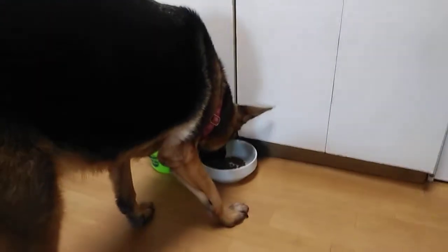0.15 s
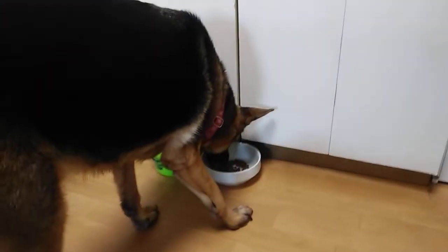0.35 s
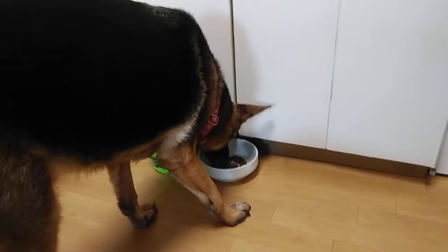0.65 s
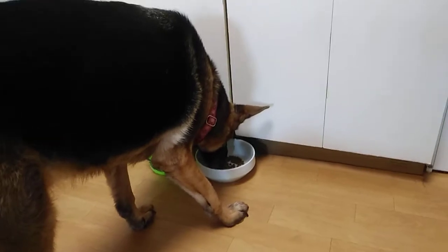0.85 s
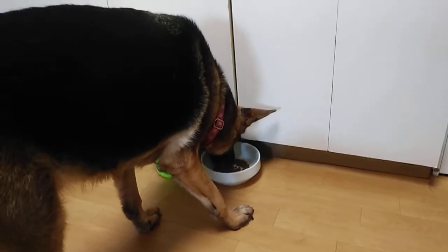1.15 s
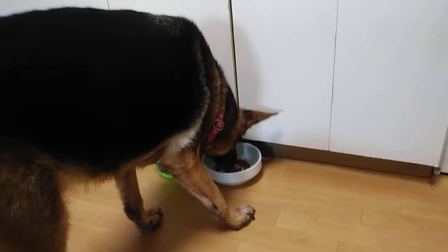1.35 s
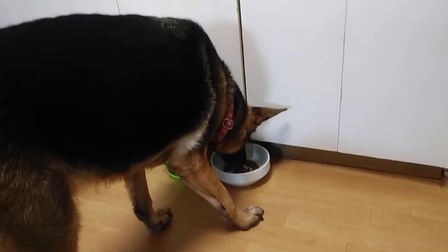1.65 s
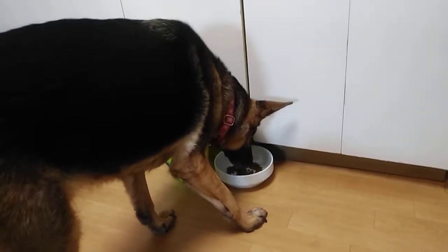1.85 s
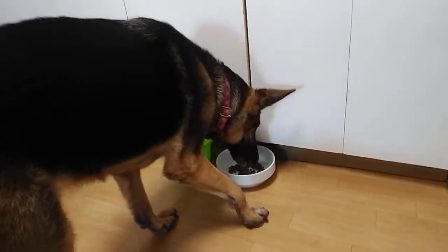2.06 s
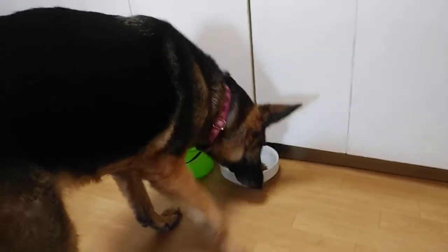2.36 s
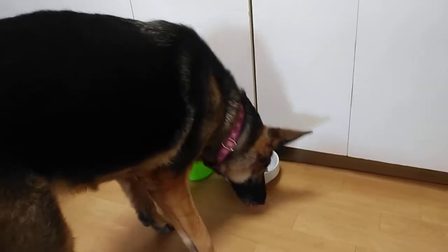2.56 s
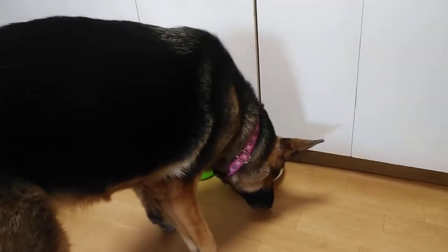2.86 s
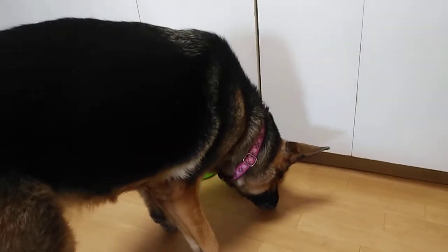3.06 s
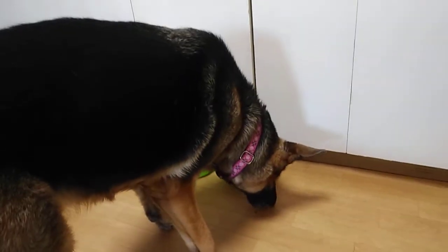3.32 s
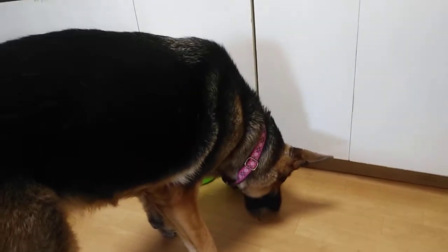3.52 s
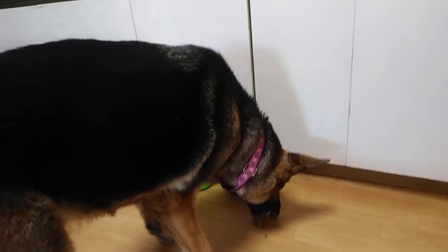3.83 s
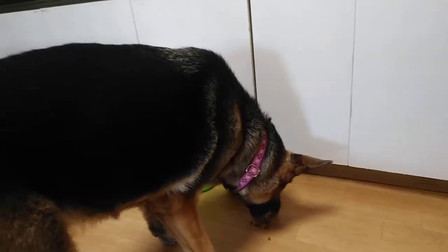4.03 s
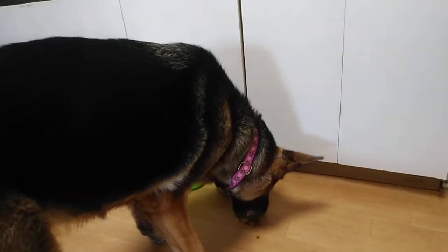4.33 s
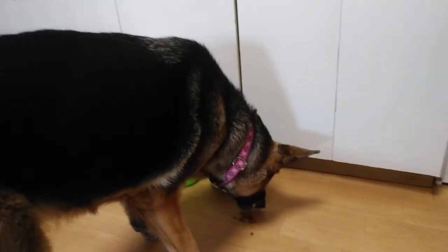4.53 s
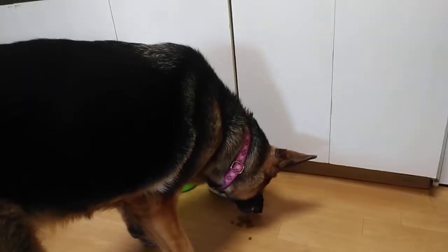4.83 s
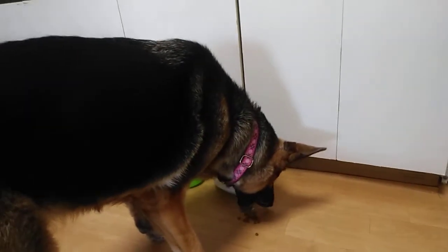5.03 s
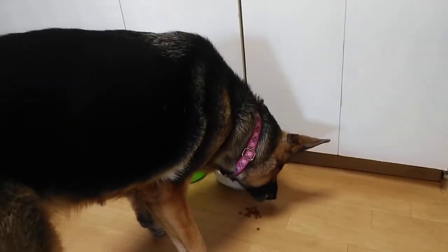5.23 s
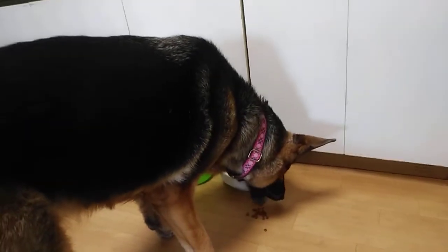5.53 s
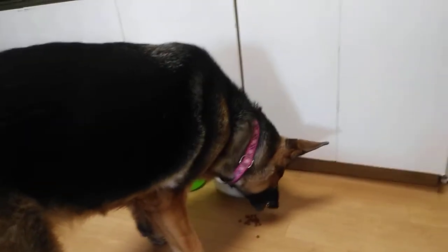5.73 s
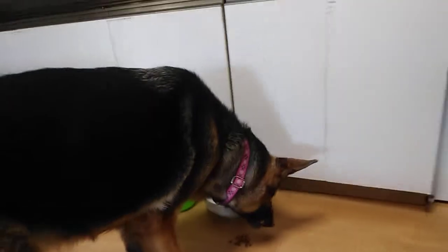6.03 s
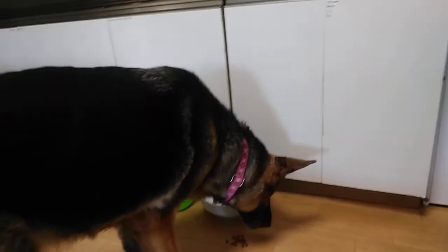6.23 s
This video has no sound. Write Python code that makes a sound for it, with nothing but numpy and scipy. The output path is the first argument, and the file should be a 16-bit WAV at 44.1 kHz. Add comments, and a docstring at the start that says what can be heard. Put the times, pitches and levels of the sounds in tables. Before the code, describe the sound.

A small, slightly echoing kitchen with low room tone and faint appliance hum, heard through a close hand-held microphone. From 0.2 to 1.5 s a large dog cracks dry pellets quickly and lightly, bright ticks mixed with tiny high clinks from a glazed bowl, while soft dull bumps knock the microphone. A lull follows until about 2.2 s, then hollow, gritty crunches swell to 2.6 s with a faint wavering low tone and a thud. Near 3.0 to 3.2 s pellets tap on the wooden floor amid sharp cracks; a bump at 3.3. From 3.5 to 4.1 s the crunching is densest and loudest, with rumble and rough scuffs peaking at 4.0, ending in a short gritty scrape. Afterward bites are sparser, strong ones at 4.5, 5.25 and 5.9 s, with more floor taps, small scuffs and repeated boomy thuds, the heaviest at 5.0, until about 6.3 s.

```python
"""A big dog eats dry food in a small kitchen: pellets crack between its teeth, each a noise burst through a
mouth resonance plus bright clicks, and crumbs grind as random grains. Pellets clink in a glazed bowl and drop
on the wooden floor (struck modes); the bowl and paws scuff. Dull handling bumps knock the hand-held microphone,
with a low rumble of handling and footsteps, a faint wavering tone, filtered-noise room tone and an appliance hum."""
import sys
import numpy as np
from scipy import signal
from scipy.io import wavfile

SR = 44100
rng = np.random.default_rng(int(sys.argv[2]) if len(sys.argv) > 2 else 0)


def persist_wave(psi):
    """Save psi, clipped to +-1, as 16-bit WAV."""
    counts = np.round(np.clip(psi, -1, 1) * 32767).astype(np.int16)
    wavfile.write(sys.argv[1], SR, np.atleast_2d(counts).T)


N = 281402

# room tone: f/Hz, relative density/dB per Hz
ROOM_TONE = [(18, -36), (30, -10), (59, 4.5), (103, -0.5), (179, -9), (245, -9), (1160, -24), (1250, -26.5),
             (1460, -27.5), (5170, -42.5), (7670, -60.5), (10800, -44.5), (13700, -52), (16000, -52)]
# appliance hum: f/Hz, width/Hz, level/dB
HUM_LINES = [(121.7, 42, -49.5), (1275.3, 18, -65.5), (11000, 33, -104)]
ROOM_TONE_DB = -44.5

# low resonances of the rumble: f/Hz, width/Hz, level/dB
RUMBLE_RESONANCES = [(82, 19.1, 4), (121.7, 50, -3.5)]
# rumble swells of handling and footsteps: peak t/s, level/dB, deep part re level/dB, fade/s
RUMBLE_SWELLS = [(0.0, -51.5, 18, 0.12), (0.5, -44.5, -5, 0.18), (1.08, -45, 10, .12), (1.542, -41, 6, 0.1),
                 (2.42, -48.5, 6, 1), (3.53, -34, -11, 0.083), (3.751, -19, -10, 0.048),
                 (3.87, -26.5, -23, 0.014), (4.07, -24, -26, 0.065), (4.48, -40, -10, 0.19),
                 (5.49, -39, 5, 0.013), (6.22, -42, 9.5, 0.1)]
RUMBLE_RISE_S = 0.028
STILL_DB, STILL_DEEP_DB = -48.5, -3.5  # rumble at rest; deep part re that
AFTER_DB, AFTER_DEEP_DB = -19, 3  # rumble after a bump, re its boom; deep part re that
AFTER_DELAY_S, AFTER_RISE_S, AFTER_FADE_S = 0.015, 0.015, 0.033

# wavering tone: t/s, level/dB
WAVER_LEVEL = [(0.0, -54), (1.87, -55), (2.24, -43.5), (2.54, -46), (2.7, -54.5), (3.0, -64.5), (3.9, -48),
               (4.34, -58.5), (6.38, -53.5)]
WAVER_HZ = 238.5

# bouts of chewing, and the gritty mid-range of the big shove near 4.0 s:
# peak t/s, grinding level/dB, hollow part re grinding/dB, hollow f/Hz, fade/s
GRIND_BOUTS = [(0.24, -68.5, 4, 2430, 0.13), (0.68, -67, -1, 2540, 0.14), (1.03, -74, -1, 2170, 0.6),
               (1.35, -71.5, 8, 1980, 0.08), (2.2, -52, 0.5, 3040, 0.05), (2.245, -58, 15.5, 4170, 0.023),
               (2.33, -64, 0, 1800, 0.12), (2.435, -50.5, 6, 3700, 0.055), (2.59, -52, 4, 3530, 0.063),
               (2.73, -54, 0.5, 1780, .06), (2.81, -64, 6, 1930, 0.031), (3.09, -70, 15, 1980, 0.073),
               (3.6, -52, 6, 2930, 0.063), (3.67, -60, 5, 2600, 0.037), (3.74, -57.5, 12.5, 1500, 0.069),
               (3.925, -53, -4, 2800, 0.086), (4.002, -50, 10, 1750, 0.05), (4.045, -48.5, 14, 1800, 0.053),
               (4.428, -66.5, 5.5, 1900, 0.093), (4.95, -61.5, 6, 3580, 0.072), (5.25, -71, 9, 1860, 0.091),
               (5.61, -66, 1, 2300, .1), (5.74, -70, 14, 1390, 0.065), (5.93, -65, 11, 1960, 0.063)]
# treble colour of the crumbs: f/Hz, width/Hz, level/dB
CRUMB_RESONANCES = [(5370, 4300, 11.5), (9880, 3100, -0.5), (14000, 3400, -7.5)]
GRIND_RISE_S = 0.012
NOSING_DB, NOSING_HOLLOW_DB, NOSING_HZ = -73.5, -3, 1560  # faint rustle between bouts

# dull handling bumps on the microphone: t/s, level/dB, boom re level/dB, hard knock re level/dB
BUMP_EVENTS = [(0.106, -20, 1, -13), (0.16, -28, 9, -15), (0.303, -23, 0, -14), (1.023, -36.5, 10, -22),
               (1.068, -33.5, 1, -20), (1.098, -28, -5, -17), (1.127, -39, 13, -22), (1.164, -41, -8, -19),
               (1.183, -27, 3, -19), (1.274, -23.5, 7.5, -15), (2.318, -18.5, 8.5, -16),
               (3.284, -15.5, 1.5, -18), (3.523, -36.5, 2, -25), (3.997, -16.5, -9, -15),
               (4.038, -23, -3, -12), (4.75, -16.5, 1, -21), (4.975, -34, 9, -22), (5.012, -32, -4, -25),
               (5.028, -11.5, -2.5, -21), (5.178, -23, -2.5, -16), (5.398, -15, 0.5, -19),
               (5.468, -31, 8, -25), (5.706, -16.5, -5, -15), (5.794, -18, 2.5, -20), (5.967, -22, -8, -22),
               (6.027, -34, 5, -23), (6.05, -35.5, 15, -25), (6.109, -32, 7, -21)]
# soft rap of a bump: f/Hz, level/dB, t60/s
RAP_MODES = [(234.4, 4, 0.026), (403.6, -4, 0.031)]
# hard knock of a bump: f/Hz, level/dB, t60/s
KNOCK_MODES = [(796, 2.5, 0.027), (1310, -6, 0.021)]
# boom of a bump: f/Hz, level/dB, t60/s
BOOM_MODES = [(66.5, -6, 0.16), (85.3, -10, 0.12)]

# bowl and paws scuffing across the floor: peak t/s, level/dB, fade/s
SCUFFS = [(.165, -47, 0.034), (1.1, -55, 0.038), (2.43, -44.5, 0.2), (3.574, -46.5, 0.042),
          (3.674, -32, 0.026), (3.744, -32.5, .08), (3.999, -24, 0.032), (4.039, -18.5, 0.044),
          (5.41, -41.5, 0.036), (5.445, -51, 0.066), (5.569, -47, .025), (5.745, -36.5, 0.02),
          (5.81, -47, 0.062)]
# floor and bowl under the scuffs: f/Hz, width/Hz, level/dB
SCUFF_RESONANCES = [(208, 44, 5), (427, 290, -6.5), (639, 150, -3.5), (1260, 630, -13.5),
                    (1730, 3100, -25.5)]
SCUFF_RISE_S = 0.0054

# pellets cracking: t/s, hollow ring f/Hz, hollow peak/dB, bright peak/dB
CRACK_EVENTS = [(0.223, 5600, -47, -41.5), (0.234, 5860, -41, -46), (0.2682, 5760, -57, -35),
                (0.3363, 2760, -42, -67), (0.3864, 1650, -53, -39.5), (0.436, 1760, -59, -43),
                (0.473, 1640, -44.5, -38), (0.618, 5000, -50, -47), (0.652, 6000, -56, -50),
                (0.677, 4770, -60, -53), (0.707, 4790, -56, -39), (0.7726, 1650, -60, -44),
                (0.8044, 2700, -55, -44), (0.8614, 3770, -42, -40), (0.9306, 6800, -65, -42.5),
                (0.9783, 2090, -49, -38.5), (0.997, 5000, -55, -44), (1.018, 6000, -53, -46),
                (1.0413, 2800, -44, -39), (1.0563, 4840, -44, -42), (1.1493, 2640, -47, -39),
                (1.163, 2770, -53, -36), (1.3434, 2550, -48, -40), (1.3828, 6000, -47, -37.5),
                (1.4124, 1530, -53, -36.5), (1.4853, 1710, -57, -40.5), (2.173, 3840, -46, -46),
                (2.2287, 4400, -41, -53), (2.254, 4330, -32, -59), (2.3254, 1980, -44, -41.5),
                (2.357, 4070, -44, -42), (2.4235, 3600, -30, -55), (2.4369, 3470, -24, -55),
                (2.4846, 3685, -27, -59), (2.585, 4970, -34, -52), (2.7242, 1690, -38.5, -40),
                (2.805, 2000, -54, -33), (2.82, 3500, -55, -36), (2.834, 4360, -45, -44),
                (2.9136, 4600, -39.5, -46), (2.99, 1830, -38.5, -36.5), (3.0765, 1700, -26, -30),
                (3.095, 2960, -31, -44), (3.1414, 1990, -29, -34.5), (3.179, 1770, -35.5, -32),
                (3.2864, 1500, -39, -71), (3.5063, 2700, -21, -53), (3.5867, 3220, -19.5, -54),
                (3.6232, 2900, -21.5, -49), (3.6411, 3100, -17, -55), (3.721, 3060, -23, -58),
                (3.79, 2830, -28.5, -34), (3.8113, 3500, -35, -52), (3.8407, 2720, -27, -56),
                (3.9157, 2880, -24.5, -59), (3.93, 2500, -32, -50), (3.9513, 2820, -29, -31),
                (4.0042, 1610, -24, -46), (4.0422, 1820, -16.5, -33), (4.122, 2880, -33, -28),
                (4.342, 2180, -40, -43.5), (4.4356, 1730, -43, -33.5), (4.5326, 2020, -33.5, -29),
                (4.631, 1930, -43, -41), (4.7336, 1520, -44, -43.5), (4.757, 1550, -60, -41.5),
                (4.941, 3750, -45.5, -45), (5.069, 6060, -49, -46), (5.177, 1520, -47, -41),
                (5.195, 1350, -38, -43.5), (5.239, 1830, -30, -24), (5.2995, 1690, -29.5, -26.5),
                (5.304, 3330, -32.5, -41), (5.5949, 5500, -39, -34.5), (5.6122, 5850, -62, -34),
                (5.692, 1590, -60, -43.5), (5.744, 2160, -32, -35), (5.796, 1490, -61, -40),
                (5.8203, 2180, -37.5, -36.5), (5.884, 6200, -46, -58), (5.913, 2070, -34.5, -29.5),
                (5.9673, 1980, -48, -38.5), (6.01, 1950, -32.5, -35)]
BRIGHT_BAND_HZ, AIRY_BAND_HZ = (4800, 10500), (10500, 16000)
AIRY_DB = -7.5  # re the bright part

# pellets and teeth against the bowl: t/s, level/dB
CLINK_EVENTS = [(0.6347, -50), (0.6782, -41), (0.707, -34), (0.7854, -47), (0.806, -47), (1.042, -40),
                (1.055, -38), (1.1503, -39), (1.167, -39), (1.206, -51), (1.344, -49), (1.3989, -53),
                (1.456, -55), (1.499, -52)]
# glazed bowl: f/Hz, level/dB, t60/s
BOWL_MODES = [(2806, -17, 0.047), (4800, -19, 0.074), (5310, -17, 0.039), (5900, -34, .04),
              (7560, -20, 0.058), (7580, -3, 0.018), (7700, -25, 0.069), (8620, -10.5, 0.053),
              (8000, -16, 0.14), (9770, -16.5, 0.15), (10000, -15, 0.043), (11250, -21, 0.06),
              (11800, -25, 0.11), (13300, -20, 0.073), (14010, -20, .06), (15130, -24, .06)]
# pellets dropping on the boards: t/s, level/dB, pitch factor of that spot
DROP_EVENTS = [(2.991, -39, 1.0), (3.075, -29, 0.97), (3.094, -46, 0.85), (3.113, -45, 1.0),
               (3.133, -34.5, 0.96), (3.178, -43.5, 0.94), (5.238, -37, 1.22), (5.303, -34, 1.18),
               (5.748, -38, 1.24)]
# floor board at pitch factor 1: f/Hz, level/dB, t60/s
BOARD_MODES = [(714, -11, 0.08), (733, -8, 0.12), (810, -9.5, 0.032), (1400, -8.5, 0.036),
               (1720, -24, 0.084), (1860, -53, 0.023)]
TOUCH_GAP_S, TOUCH_LOSS_DB = 0.003, 6  # mean gap; loss per further touch

# glazed foot hissing along the boards: t/s, level/dB
SCRAPE_LEVEL = [(4.02, -57), (4.05, -39.5), (4.125, -46), (4.2, -62.5)]

ROOM_T60_S, WALL_CUT_HZ, ROOM_DB = 0.24, 3300, -19
# microphone port resonance: f/Hz, width/Hz, gain/dB
PORT_RESONANCE = (7540, 730, 9.76)
MIC_LOW_HZ, CUTOFF_HZ = 43, 16500


def amp(db):
    """Amplitude factor of a level in dB."""
    return 10 ** (np.asarray(db) / 20)


def rms_one(x):
    """Scale to rms 1."""
    return x / np.sqrt(np.mean(x ** 2) + 1e-20)


def peak_one(x):
    """Scale to peak 1."""
    return x / np.abs(x).max()


def in_time(rows):
    """Columns interpolated along the whole length; -120 outside the table's span."""
    s, *columns = np.transpose(rows)
    t = np.arange(N) / SR
    return [np.interp(t, s, column, left=-120, right=-120) for column in columns]


def swells(s, db, rise_s, fade_s):
    """One gain row per event, every 64 samples: exponential rise to the peak, exponential fade after it."""
    s, db, fade_s = (np.reshape(v, (-1, 1)) for v in (s, db, fade_s))
    t = np.arange(0, N + 64, 64) / SR - s
    exponent = np.where(t < 0, t / rise_s, -t / np.maximum(fade_s, 0.002))
    return amp(db) * np.exp(exponent)


def fill(slow):
    """Interpolate a 64-sample control curve to every sample."""
    return np.interp(np.arange(N) / 64, np.arange(len(slow)), slow)


def drift(corner_hz):
    """Slow random curve, rms 1: low-passed noise made at SR / 40."""
    r = np.exp(-80 * np.pi * corner_hz / SR)
    noise = rng.standard_normal(N // 40 + 2002)
    slow = signal.lfilter([1], [1, -2 * r, r * r], noise)[2000:]  # drop the settling
    return np.interp(np.arange(N) / 40, np.arange(len(slow)), rms_one(slow))


def band(x, lo_hz, hi_hz):
    """Butterworth band-pass."""
    sos = signal.butter(2, [lo_hz, min(hi_hz, SR / 2.2)], "band", fs=SR, output="sos")
    return signal.sosfilt(sos, x + 1e-18)


def resonate(x, hz, width_hz):
    """Two-pole resonance with gain 1 on top."""
    r = np.exp(-np.pi * width_hz / SR)
    a = [1, -2 * r * np.cos(2 * np.pi * hz / SR), r * r]
    return signal.lfilter([(1 - r * r) / 2, 0, (r * r - 1) / 2], a, x)


def body(x, resonances):
    """Parallel resonances of alternating sign; rms 1."""
    out = 0
    for k, (hz, width_hz, db) in enumerate(resonances):
        out = out + (-1) ** k * amp(db) * resonate(x, hz, width_hz)
    return rms_one(out)


def glide(x, hz, width):
    """Resonance with a moving centre, width as a share of the centre; rms 1 overall."""
    out, state = np.zeros(N), np.zeros(2)
    for i in range(0, N, 256):
        r = np.exp(-np.pi * width * hz[i] / SR)
        gain = np.sqrt(1 - r * r)
        a = [1, -2 * r * np.cos(2 * np.pi * hz[i] / SR), r * r]
        out[i:i + 256], state = signal.lfilter([gain, 0, -gain], a, x[i:i + 256], zi=state)
    return rms_one(out)


def clicks(s, db):
    """Single-sample impulses at the given times and levels."""
    out = np.full(N, 1e-18)
    np.add.at(out, (np.asarray(s) * SR).astype(int), amp(db))
    return out


def strike(s, db, modes, spread_db):
    """Every blow rings all modes as decaying sines, each with a random strength of its own."""
    out = 0
    chance = rng.standard_normal((len(s), len(modes)))
    for k, (hz, level_db, t60_s) in enumerate(modes):
        r, w = amp(-60 / (t60_s * SR)), 2 * np.pi * hz / SR
        blows = clicks(s, db + level_db + spread_db * chance[:, k])
        out = out + signal.lfilter([0, np.sin(w)], [1, -2 * r * np.cos(w), r * r], blows)
    return out


def touches(rows):
    """Each contact is a short, uneven run of four touches, each weaker than the last."""
    s, db = np.transpose(rows)[:, :, None]
    gaps = TOUCH_GAP_S * rng.uniform(0.4, 1.6, (len(rows), 4))
    times_s = s + np.cumsum(gaps, axis=1) - gaps[:, :1]
    levels_db = db - TOUCH_LOSS_DB * np.arange(4)
    return times_s.ravel(), levels_db.ravel()


def grains(per_s, spread_db):
    """Random clicks of very uneven size and random sign."""
    sizes = amp(spread_db * np.minimum(rng.exponential(1, N), 5)) * rng.choice([-1, 1], N)
    return sizes * (rng.random(N) < per_s / SR) + 1e-18


def crumbs(dense_per_s, ticks_per_s, tick_db):
    """A clumped bed of fine grains with lone, larger noise ticks that die within milliseconds."""
    bed = rms_one(grains(dense_per_s, 2.1) * amp(2.74 * drift(25.0)))
    fade = np.exp(-1 / (0.00099 * SR))
    envelope = signal.lfilter([1], [1, -fade], np.abs(grains(ticks_per_s, 4.66)))
    ticks = envelope * rng.standard_normal(N)
    return bed + amp(tick_db) * rms_one(ticks)


def room_tone():
    """Third-octave bands of steady noise, and the hum as narrow resonances of noise."""
    out = 0
    edges_hz = 22 * 2 ** (np.arange(30) / 3)
    white = rng.standard_normal((2, N))  # neighbouring bands use different noise
    hz, db = np.transpose(ROOM_TONE)
    for k, (low_hz, high_hz) in enumerate(zip(edges_hz, edges_hz[1:])):
        band_db = np.interp(np.log(low_hz * high_hz) / 2, np.log(hz), db)
        out = out + amp(band_db) * band(white[k % 2], low_hz, high_hz)
    hum = 0
    for line_hz, width_hz, line_db in HUM_LINES:
        once = resonate(white[0] - white[1], line_hz, width_hz)
        hum = hum + amp(line_db) * rms_one(resonate(once, line_hz, width_hz))
    return amp(ROOM_TONE_DB) * rms_one(out) + hum


def rumble():
    """Handling and footsteps as low-pitched random pushes: at rest, in swells and after each bump."""
    s, db, deep_db, fade_s = np.transpose(RUMBLE_SWELLS)
    rows = swells(s, db, RUMBLE_RISE_S, fade_s)
    bump_s, bump_db, boom_db, _ = np.transpose(BUMP_EVENTS)
    after = swells(bump_s + AFTER_DELAY_S, bump_db + boom_db + AFTER_DB, AFTER_RISE_S, AFTER_FADE_S).sum(0)
    upper = rms_one(band(body(grains(300, 3.94), RUMBLE_RESONANCES), 87.5, 267))
    deep = rms_one(band(grains(200, 1.9), 43.3, 68.1))
    upper_gain = amp(STILL_DB) + rows.sum(0) + after
    deep_gain = amp(STILL_DB + STILL_DEEP_DB) + amp(deep_db) @ rows + amp(AFTER_DEEP_DB) * after
    return fill(upper_gain) * upper + fill(deep_gain) * deep


def wavering_tone():
    """One sine whose phase wanders at random and whose level follows its table."""
    phase = 2 * np.pi * WAVER_HZ * np.arange(N) / SR + 0.91 * drift(4.7)
    return amp(in_time(WAVER_LEVEL)[0]) * np.sin(phase)


def grinding():
    """Rubbing grains: bright treble plus a hollow ring (mouth, or big shove near 4.0 s) led by the loudest bout."""
    s, db, hollow_db, hz, fade_s = np.transpose(GRIND_BOUTS)
    grind = swells(s, db, GRIND_RISE_S, fade_s)
    ring = swells(s, db + hollow_db, GRIND_RISE_S, fade_s)
    rest = amp(NOSING_DB + NOSING_HOLLOW_DB)
    # mean frequency weighted by power
    hollow_hz = (hz @ ring ** 2 + NOSING_HZ * rest ** 2) / ((ring ** 2).sum(0) + rest ** 2)
    rub = crumbs(6000, 70, tick_db=-3.5)
    bright = rms_one(band(body(rub, CRUMB_RESONANCES), 4900, CUTOFF_HZ))
    hollow = glide(band(rub, 700, 4300), fill(hollow_hz), width=0.84)
    return fill(grind.sum(0) + amp(NOSING_DB)) * bright + fill(ring.sum(0) + rest) * hollow


def handling_bumps():
    """Knocks on the microphone: a soft rap and its harder knock come first; the boom follows and lasts longer."""
    s, db, boom_db, knock_db = np.transpose(BUMP_EVENTS)
    rap = strike(s + 0.002204, db, RAP_MODES, spread_db=1.5)
    knock = strike(s + 0.002014, db + knock_db, KNOCK_MODES, spread_db=3.5)
    boom = strike(s + 0.00701, db + boom_db, BOOM_MODES, spread_db=0.5)
    return signal.sosfilt(signal.butter(4, 1700, fs=SR, output="sos"), rap + knock + boom)


def scuffs():
    """Stick and slip: soft, lumpy contacts into the floor and bowl."""
    slips = body(grains(700, 1.37) * amp(0.8 * drift(81)), SCUFF_RESONANCES)
    s, db, fade_s = np.transpose(SCUFFS)
    return fill(swells(s, db, SCUFF_RISE_S, fade_s).sum(0)) * rms_one(band(slips, 98, 2260))


def cracks():
    """A sharp break, a few ms of splinters and a weak crumble ring the mouth and radiate as bright clicks."""
    out, t = np.zeros(N + 4096), np.arange(4096) / SR
    noises = rng.standard_normal((len(CRACK_EVENTS), len(t)))
    splinters = amp(-7.0) * np.exp(-t / 0.0016)
    crumble = amp(-20.0) * np.exp(-t / 0.02)
    for (s, hz, hollow_db, bright_db), noise in zip(CRACK_EVENTS, noises):
        burst = noise * (splinters + crumble)
        burst[0] = 1.93  # the break
        hollow = peak_one(band(resonate(burst, hz, 0.35 * hz), 0.24 * hz, 3.8 * hz))
        bright = peak_one(band(burst, *BRIGHT_BAND_HZ))
        airy = peak_one(band(burst, *AIRY_BAND_HZ))
        crack = amp(hollow_db) * hollow + amp(bright_db) * (bright + amp(AIRY_DB) * airy)
        out[round(s * SR):][:len(t)] += crack
    return out[:N]


def clinks():
    """Runs of touches ring the modes of the glazed bowl."""
    return strike(*touches(CLINK_EVENTS), BOWL_MODES, spread_db=3.5)


def drops():
    """Each spot of the floor rings with the same modes, shifted in pitch."""
    out = 0
    for s, db, pitch in DROP_EVENTS:
        modes = np.array(BOARD_MODES) * [pitch, 1, 1]
        out = out + strike(*touches([(s, db)]), modes, spread_db=4.0)
    return out


def scrape():
    """Fine, dense grit under the sliding bowl."""
    hiss = rms_one(band(crumbs(8000, 120, tick_db=-14), 3600, 10000))
    return amp(in_time(SCRAPE_LEVEL)[0]) * hiss


def kitchen(x):
    """Room echo: eight feedback delays, duller on every round, stepped block by block."""
    out, dull = np.zeros(N), np.exp(-2 * np.pi * WALL_CUT_HZ / SR)
    lags = (rng.uniform(0.0055, 0.028, 8) * SR).astype(int)
    for k, lag in enumerate(lags):
        loop, state = x.copy(), [0.]
        gain = amp(-60 * lag / SR / ROOM_T60_S)
        for i in range(lag, N, lag):
            back, state = signal.lfilter([gain * (1 - dull)], [1, -dull], loop[i - lag:i], zi=state)
            loop[i:i + lag] += back[:N - i]
        out += (loop - x) * (-1) ** k
    return out


def scene():
    """Only the eating and scuffing excite the room echo."""
    eating = grinding() + scuffs() + cracks() + clinks() + drops() + scrape()
    echo = amp(ROOM_DB) * kitchen(eating)
    return (eating + echo + handling_bumps() + rumble() + wavering_tone() + room_tone())[None]


def record(dry):
    """The microphone port lifts the treble at its resonance; the lowest bass and the top are cut."""
    hz, width_hz, db = PORT_RESONANCE
    coloured = dry + (amp(db) - 1) * resonate(dry, hz, width_hz)
    low_cut = signal.butter(3, MIC_LOW_HZ, "high", fs=SR, output="sos")
    top_cut = signal.cheby2(10, 50, CUTOFF_HZ, fs=SR, output="sos")  # 50 dB down from CUTOFF_HZ up
    return signal.sosfilt(top_cut, signal.sosfilt(low_cut, coloured))


dry = scene()
out = record(dry)
persist_wave(out)
```